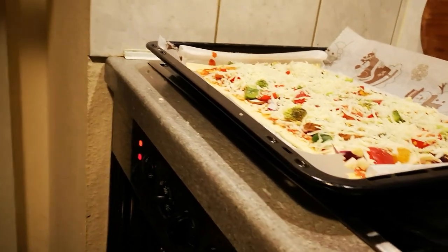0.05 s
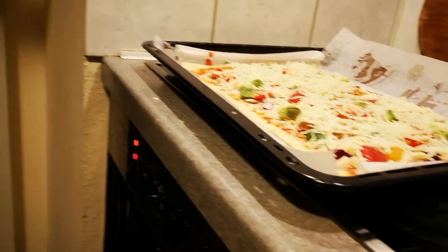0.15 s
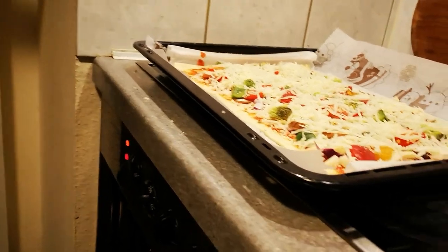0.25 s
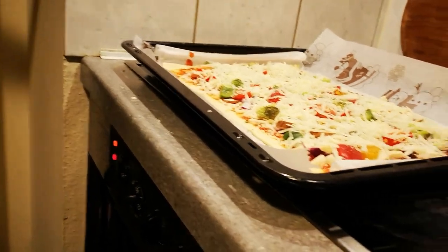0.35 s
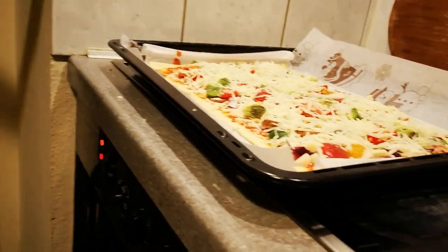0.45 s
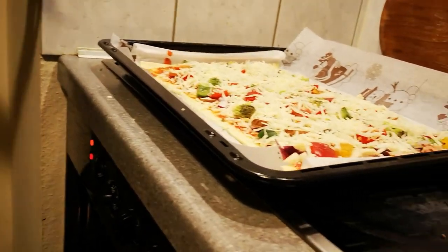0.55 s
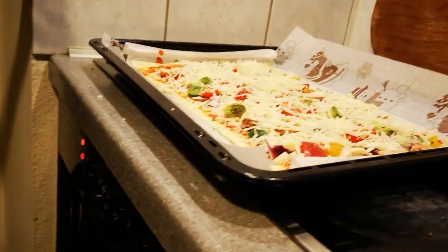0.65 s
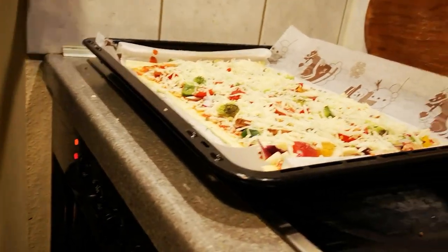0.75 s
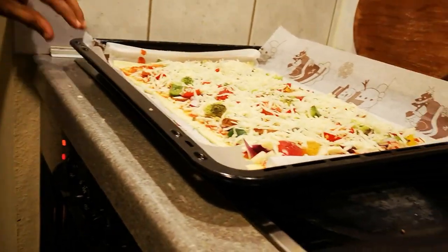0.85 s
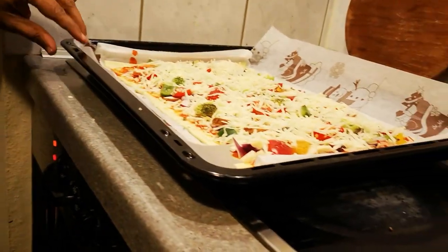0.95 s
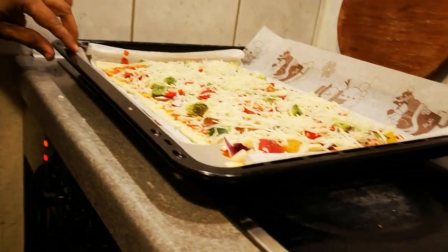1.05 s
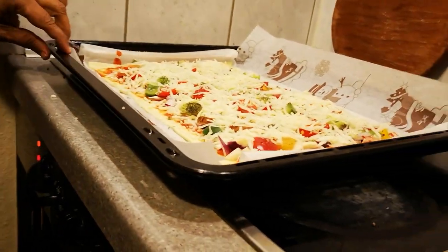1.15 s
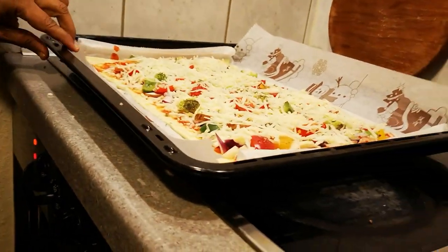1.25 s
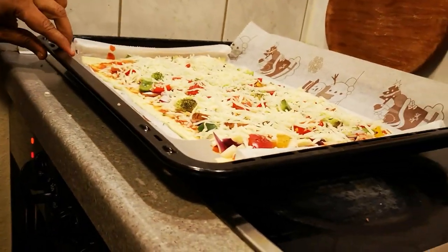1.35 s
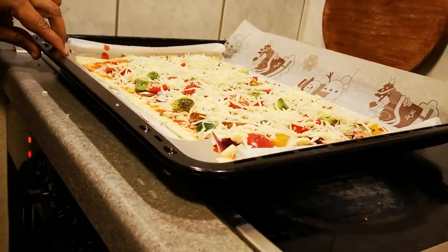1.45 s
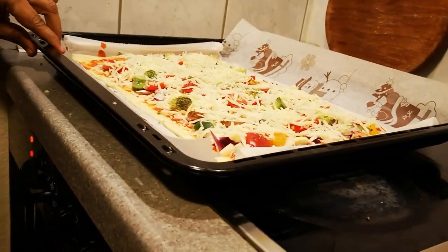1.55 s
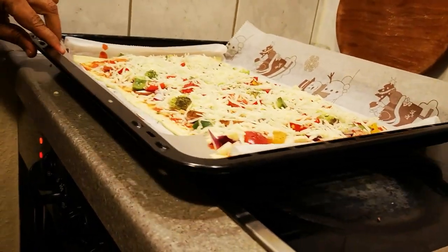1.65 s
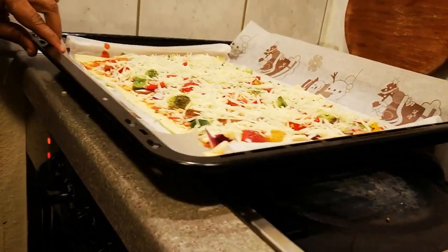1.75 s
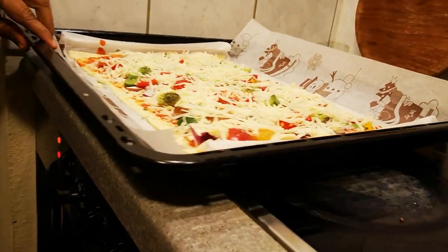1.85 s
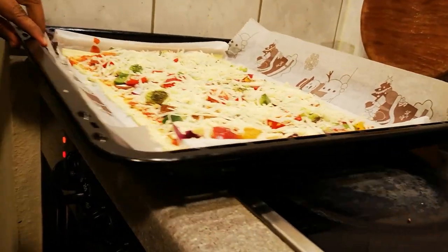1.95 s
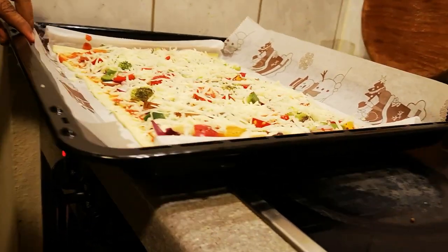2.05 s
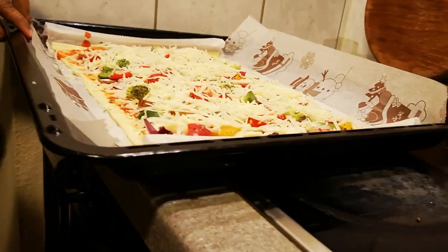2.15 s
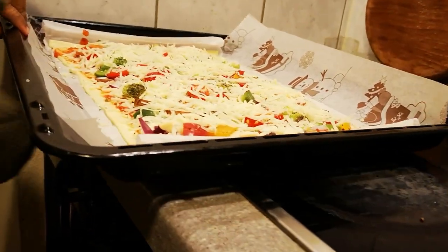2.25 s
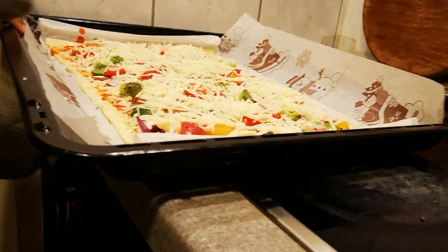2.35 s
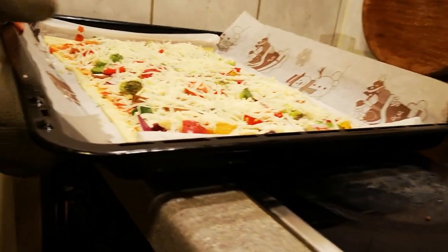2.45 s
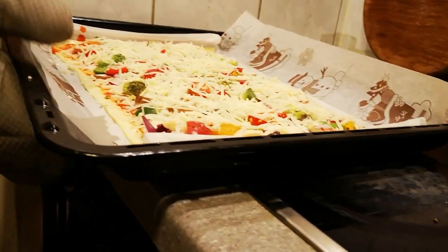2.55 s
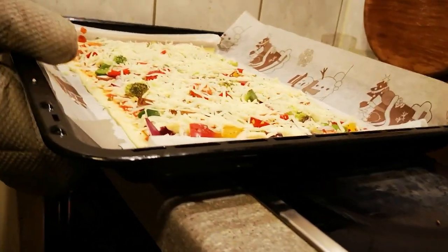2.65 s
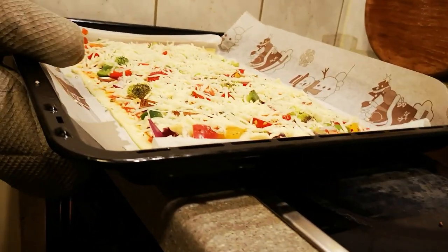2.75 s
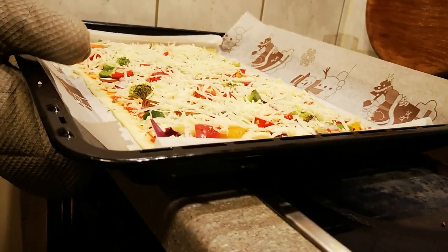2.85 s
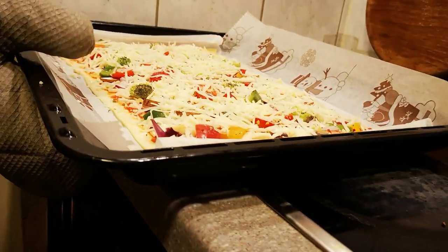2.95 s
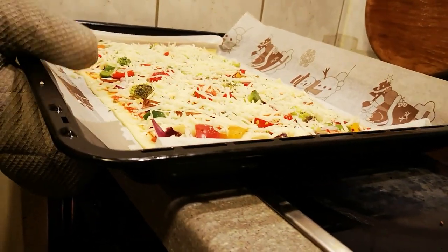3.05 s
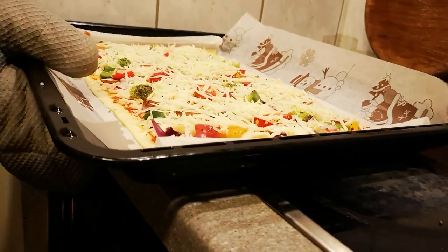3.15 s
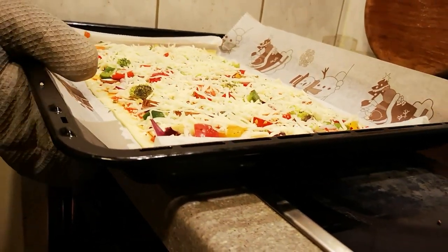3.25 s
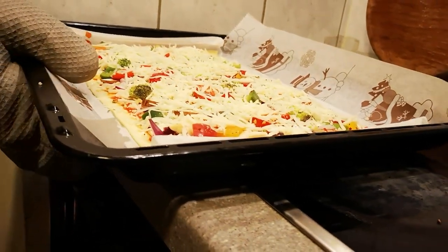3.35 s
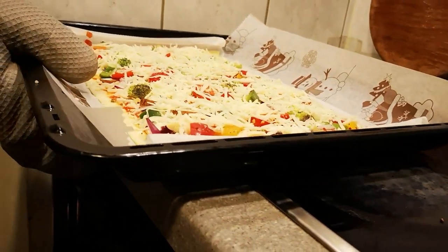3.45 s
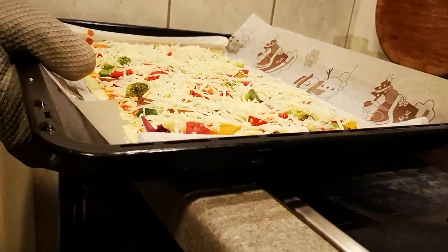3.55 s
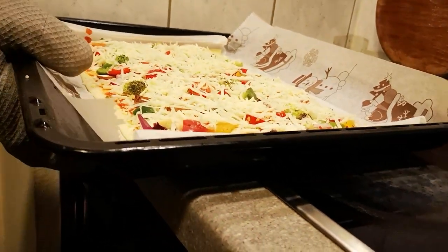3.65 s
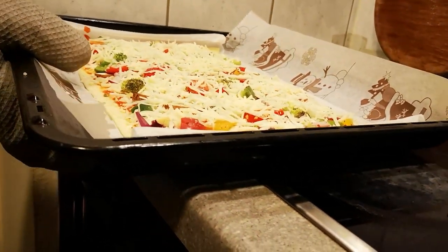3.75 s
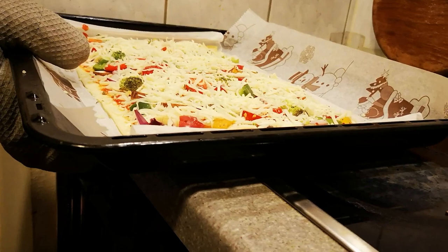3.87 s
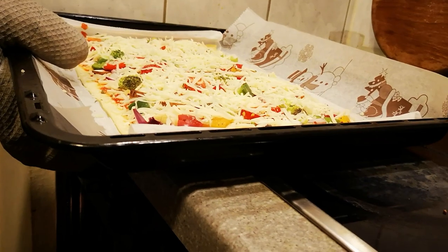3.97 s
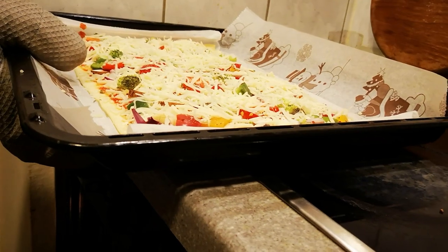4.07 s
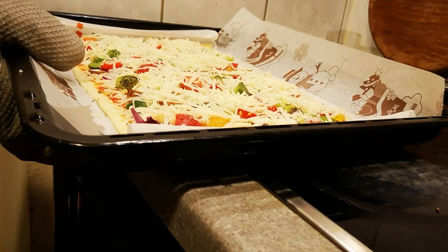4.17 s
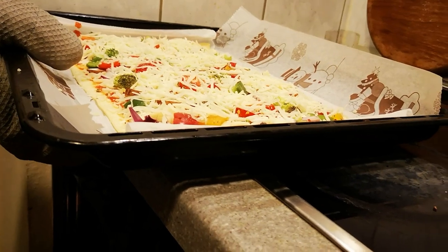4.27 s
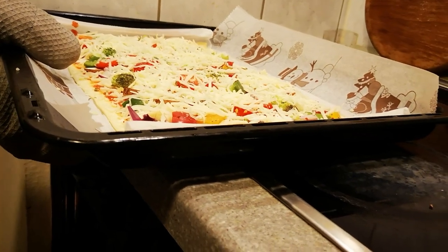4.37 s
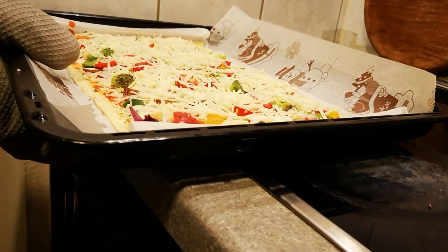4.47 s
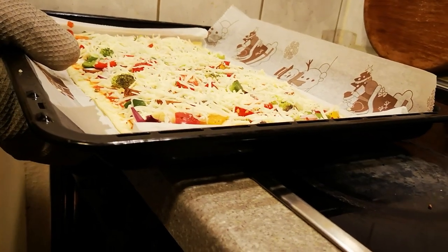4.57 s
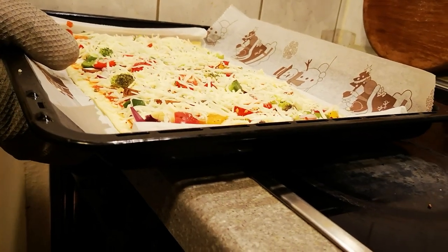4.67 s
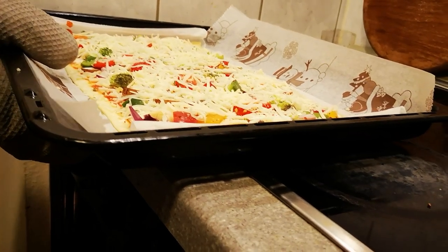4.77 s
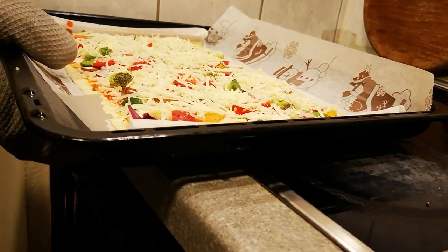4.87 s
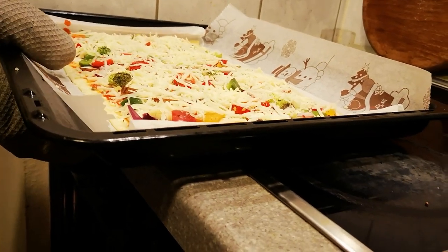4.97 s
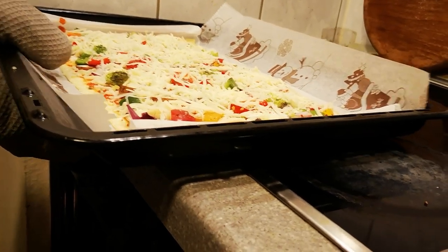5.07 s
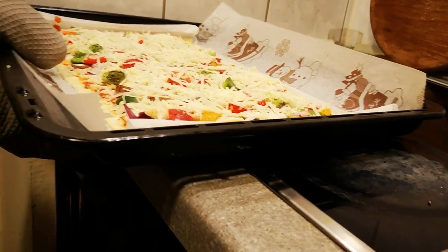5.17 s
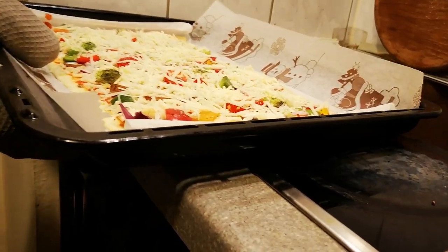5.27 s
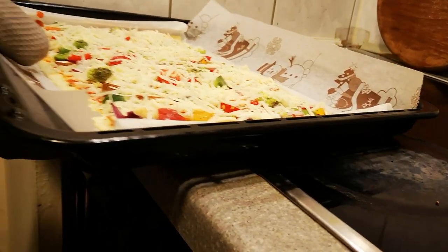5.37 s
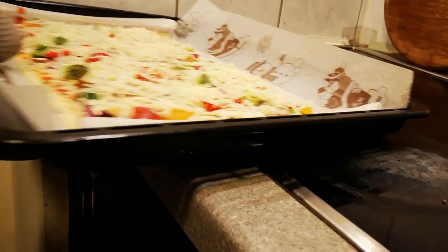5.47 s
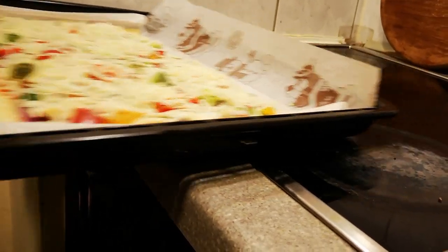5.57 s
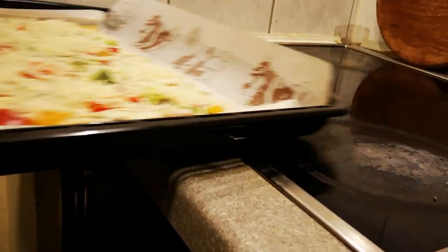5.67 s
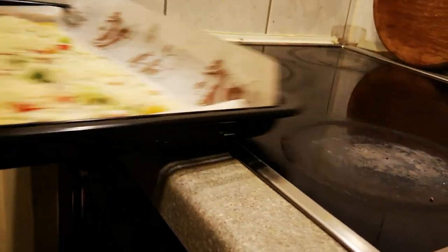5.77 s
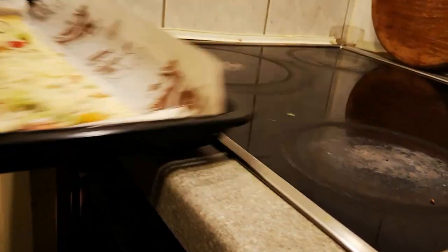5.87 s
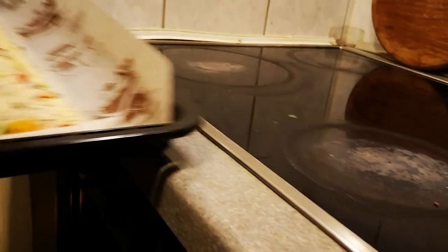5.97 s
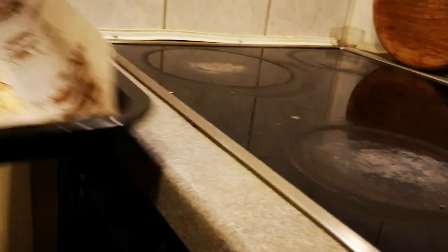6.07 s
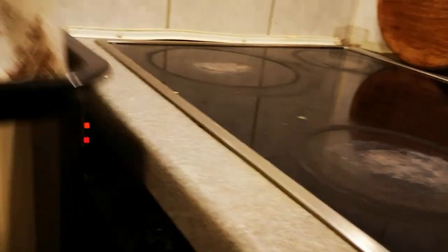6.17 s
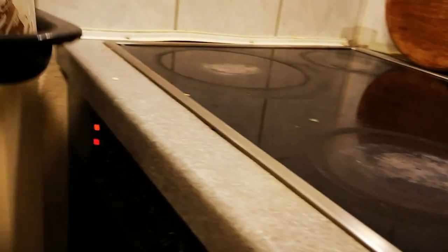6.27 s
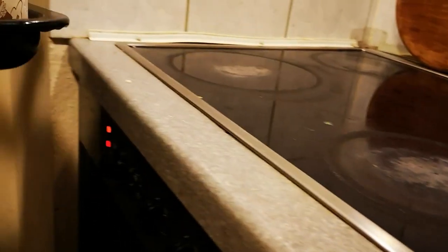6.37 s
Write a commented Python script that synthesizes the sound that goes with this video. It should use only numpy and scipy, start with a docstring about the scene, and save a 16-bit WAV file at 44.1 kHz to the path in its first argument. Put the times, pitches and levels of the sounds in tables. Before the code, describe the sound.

A steel baking tray booms, knocks and scrapes as it is pulled off another tray, ending in a clang, with baking paper rustling.

```python
"""A loaded steel baking tray is worked off a second tray on a kitchen hob and carried away.
Its floor bends with a low boom, its rim knocks and scrapes, and it clangs and clinks as it comes free.
Each knock is a burst of noise plus ringing tones; each scrape is a stream of tiny slips.
Baking paper snaps and rustles, an oven mitt brushes, and a small tiled room echoes over a faint hum."""
import sys
import numpy as np
from scipy import signal
from scipy.fft import rfft, irfft, next_fast_len
from scipy.io import wavfile

SR = 44100
rng = np.random.default_rng(int(sys.argv[2]) if len(sys.argv) > 2 else 0)


def to_wav(s):
    """Save 16-bit WAV."""
    ch = np.atleast_2d(s).T  # columns
    pcm = np.round(np.clip(ch, -1, 1) * 32767)  # PCM
    wavfile.write(sys.argv[1], SR, pcm.astype(np.int16))


N = 283122
T = np.arange(round(.8 * SR)) / SR  # the clock of one short sound, in seconds

# The quiet room's noise. Each row: frequency in Hz, relative strength in dB.
ROOM_COLOUR = [(12, -32), (20, 0.5), (54, -3), (70, -13.5), (103, -7), (171, -23.5), (202, -19.5),
               (362, -29), (393, -26.5), (427, -31.5), (491, -28), (705, -25.5), (788, -32), (1720, -25),
               (15500, -45)]
# The mains hum. Each row: pitch in Hz, level in dB.
HUM_TONES = [(48.4, -69.5), (96.9, -74), (393, -95)]
# How alike the two sides sound. Each row: frequency in Hz, likeness from -1 (opposite) to 1 (same).
LIKENESS = [(120, 0.98), (290, 0.57), (640, -0.37), (3000, -0.062), (7000, 0.32), (15000, 1)]
# The kitchen's echo. Each row: frequency in Hz, seconds to fade by 60 dB.
ECHO_TIMES = [(150, 0.59), (1500, 0.28), (6000, 0.25), (14000, 0.16)]
# Short rubs. Each row: start and length in seconds, first pitch, last pitch and blur in Hz, level in dB.
CHAFE_GLIDES = [(0.046, 0.24, 2770, 2080, 450, -66.5), (0.191, 0.1, 2008, 1260, 390, -61),
                (1.102, 0.03, 3300, 3860, 550, -60.5), (3.272, 0.014, 4590, 5040, 1408, -59),
                (5.285, 0.2, 695, 817, 30, -59)]
# Paper and mitt brushing. Each row: start in seconds, length in seconds, level in dB.
BRUSH_STROKES = [(0.301, .15, -60), (1.365, 0.057, -47), (3.431, .2, -63), (3.557, .085, -55),
                 (3.629, 0.15, -66.5), (4.848, .15, -72.5), (5.623, 0.09, -60), (5.754, .13, -57),
                 (6.048, .11, -53)]
# The paper buckling. Each row: start in seconds, relative level in dB, number of snaps.
SNAP_RUNS = [(1.3721, -36, 4), (2.769, -62, 1), (3.914, -68, 1), (5.088, -66, 1), (5.228, -62.5, 1)]
# Short shoves of the tray. Each row: start, time speeding up and time slowing in seconds, level in dB.
TRAY_SHOVES = [(.01, .17, 0.27, -69.5), (1.24, 0.027, 0.15, -69.5), (1.61, 0.34, .39, -52),
               (1.94, 0.045, .05, -50.5), (3.14, .14, 0.21, -63), (3.4, .26, 0.13, -60),
               (5.88, 0.23, .025, -45.5)]
# The long pull off the lower tray. Each row: time in seconds, relative effort in dB.
LONG_PULL = [(5.15, -81), (5.246, -67.5), (5.334, -68), (5.346, -58), (5.628, -56.5), (5.65, -46.5),
             (5.768, -49), (5.814, -37), (5.885, -49)]
# The tray's floor bending. Each row: start in seconds, level in dB, seconds held, pitch in Hz,
# shudder in dB compared with the boom.
FLOOR_BENDS = [(1.486, -34, 0.049, 69.07, -25), (1.55, -43, 0.22, 70.75, -23),
               (1.755, -32.5, 0.048, 68.1, -10), (1.855, -30.5, 0.067, 69.1, -16),
               (1.93, -27.5, .05, 71.2, -13.5), (2.76, -51, .04, 66.3, -10.5),
               (2.82, -33.5, 0.068, 66, -14), (2.9, -36.5, .05, 62, -19), (3.178, -36, .03, 70.6, -8),
               (3.24, -41, 0.11, 71.1, -9.5), (5.221, -29.5, .045, 75.93, -19),
               (5.81, -27.5, 0.035, 74.07, -8.5), (5.895, -36.5, 0.064, 70.6, -2.5)]
# Blows on the tray. Each row: start in seconds, level in dB, brightness in Hz, flatness from 0 (edge)
# to 1 (whole floor), number of bounces, seconds between them, dB lost per bounce.
TRAY_BLOWS = [(1.258, -67, 2500, 0.93, 0, 0, 0), (1.7523, -26.5, 2720, 0.81, 1, 0.024, 9),
              (2.006, -41.5, 3020, .25, 0, 0, 0), (2.746, -64, 2200, 0.82, 0, 0, 0),
              (2.8197, -47, 2560, .9, 1, .0334, 2), (3.177, -50, 1490, 1, 3, .038, 2.5),
              (5.653, -48.5, 4007, 0.14, 0, 0, 0), (5.809, -35.5, 2500, 0.24, 1, .054, 3.5),
              (5.894, -18, 8400, 0.017, 1, 0.0036, 1.5), (6.022, -40.5, 2400, 0.16, 0, 0.0026, 0)]

# The colours (spectra) of the noises. Each row: frequency in Hz, relative strength in dB.
RUSTLE_COLOUR = [(1500, -20), (4000, -7), (6500, -1.5), (10000, -1.5), (15000, -12)]  # brushed paper
BUCKLE_COLOUR = [(600, -16), (1600, 2), (3200, -17), (4300, -15), (5000, -7), (6000, -14.5), (8200, -12),
                 (9300, -6.5), (10500, -14), (12200, -7), (13200, -15), (15500, -13.5)]  # snapping paper
RASP_COLOUR = [(120, -35), (200, -1.5), (352, -17.5), (399, -17), (607, -16.5), (1130, -1), (1280, -7),
               (1710, -1.5), (2250, -2), (2420, -2.5), (4260, -17), (9310, -21.5), (15500, -39.5)]  # steel sliding on steel
CRACK_COLOUR = [(500, -33.5), (1250, 6.5), (1700, -3), (3500, 1), (5000, -7), (7000, -9.5), (7700, -31),
                (9000, -16.5), (12000, -26), (14000, -22)]  # the struck rim
SHUDDER_COLOUR = [(20, -11), (38, 0), (60, -5), (125, -1), (170, -5), (250, -18.5), (400, -40.5),
                  (800, -69)]  # the bending floor's rough rumble
CLANK_COLOUR = [(60, -11.5), (200, -3), (400, -5), (560, -18), (800, -17.5), (1050, 5.5), (2200, 3.5),
                (3600, -6.5), (7000, -12), (8500, -21), (15000, -19)]  # a crowd of tones that die quickly
CLUNK_COLOUR = [(150, -3.5), (300, -7), (520, -14.5), (700, -1.5), (1050, 1.5), (1350, -15), (1800, -1),
                (2100, -4), (2400, -9), (2800, -9.5), (4000, -30.5), (15000, -57.5)]  # one tray inside the other

# The tones the steel rings with. Each row: pitch in Hz, relative level in dB, seconds to fade by 60 dB.
RIM_TONES = [(1270, -8, .14), (1340, -8, .14), (2032, 3, .19), (2600, -11, .16), (3235, -2, .18),
             (3990, -10, .2), (4235, -11, .22), (4440, -10, .22), (5572, -13, .18), (6520, -14, .2),
             (6799, -10, .19), (7030, -14, .2)]  # the stiff rim
SHEET_TONES = [(1034, -1, .34), (1330, -9, .38), (1384, -13, .4), (1465, 1, .34), (1646, 3, .28),
               (1787, -9, .3), (1938, -11, .38), (1977, -7, .3), (2033, -6, .3), (2234, -9, .3),
               (2283, -3, .28), (2326, -10, .33), (2428, -6, .3), (2702, -13, .33), (2966, -11, .27),
               (3252, -16, .28), (3973, -17, .25), (4269, -16, .25), (4915, -15, .22), (5190, -12, .2),
               (5765, -11, .25), (6255, -12, .23), (6643, -14, .22), (7122, -11, .2)]  # the thin sheet bending
PAN_TONES = [(121, 0, 0.38), (162.4, -3, 0.17), (202.8, 0.5, 0.51), (244.6, -2, 0.4), (311, -6, .3),
             (337, -8, 0.52), (373, -6.5, 0.35)]  # the whole pan swaying


def amp(db):
    """Turn decibels into a gain."""
    return 10 ** (np.asarray(db) / 20)


def unit(x):
    """Scale a sound to an average (rms) size of 1."""
    return x / np.sqrt(np.mean(x ** 2) + 1e-20)


def along(points, hz):
    """Read between a table's rows on a logarithmic frequency scale."""
    freqs, values = np.transpose(points)
    return np.interp(np.log(hz + 1), np.log(freqs + 1), values)


def fade(t60, t=T):
    """A fall of 60 dB every t60 seconds."""
    return np.exp(-np.log(1000) * t / t60)


def filtered(x, response):
    """Multiply each frequency in a sound by response(hz)."""
    size = next_fast_len(x.shape[-1] + 8192)
    hz = np.fft.rfftfreq(size, 1 / SR)
    return irfft(rfft(x, size) * response(hz), size)[..., :x.shape[-1]]


def coloured(x, colour):
    """Give a sound a colour and an average size of 1."""
    return unit(filtered(x, lambda hz: amp(along(colour, hz))))


def butter(x, hz, kind, order=2):
    """Keep the 'low' or the 'high' side of a frequency."""
    return signal.sosfilt(signal.butter(order, min(hz, .45 * SR), kind, fs=SR, output='sos'), x)


def add(track, start, x):
    """Mix a sound into the track from start seconds on."""
    part = track[..., round(start * SR):][..., :x.shape[-1]]
    part += x[..., :part.shape[-1]]


def waver(hz):
    """A random curve that wanders at rates up to about hz."""
    return unit(butter(rng.standard_normal(N), hz, 'low'))


def burst(colour, t60):
    """Dying noise whose first 5 milliseconds have an average size of 1."""
    noise = coloured(rng.standard_normal(len(T)), colour) * fade(t60)
    return noise / np.std(noise[T < .005])


def diffuse(pair):
    """Blend two unrelated sounds into left and right, alike in the bass."""
    turn = lambda hz: np.arccos(np.clip(along(LIKENESS, hz), -1, 1)) / 2
    mid, side = filtered(pair, lambda hz: np.array([np.cos(turn(hz)), np.sin(turn(hz))]))
    return np.array([mid + side, mid - side])


def ring(tones, scatter_db=2):
    """Fading tones; each blow lands somewhere new and shares its force among them differently."""
    out = np.zeros(len(T))
    for hz, db, t60 in tones:
        gain = amp(db + scatter_db * rng.standard_normal())
        out += gain * fade(t60) * np.sin(2 * np.pi * (hz * T + rng.random()))
    return out


def radiated(tones):
    """A wide sheet sends each tone differently to the two sides."""
    return diffuse(np.array([ring(tones), ring(tones)])) * (1 - fade(.004))


def friction(slips_per_s, spread_db, hiss):
    """Tiny slips of uneven size over a smooth hiss, while the hand's pressure wavers."""
    slips = (rng.random(N) < slips_per_s / SR) * rng.choice([-1, 1], N)
    sizes = amp(spread_db * rng.standard_normal(N))
    pressure = amp(1.8 * waver(hz=25))
    return unit(pressure * (unit(slips * sizes) + hiss * rng.standard_normal(N)))


def stroke(start, rise, fall, db):
    """The gain of one rub: it grows as the hand speeds up and shrinks as it stops."""
    speed = np.interp(np.arange(N) / SR, [start, start + rise, start + rise + fall], [0, 1, 0])
    return amp(db) * speed ** 1.1


def in_kitchen(x, tail_db, early_db=-1):
    """The direct sound, quick echoes off worktop and tiles, then the room's fading tail."""
    hz, t, bands = signal.stft(rng.standard_normal((2, len(T))), SR, nperseg=256)
    bands = bands * fade(along(ECHO_TIMES, hz)[:, None], t)
    tail = signal.istft(bands, SR, nperseg=256)[1][:, :len(T)]
    tail *= 1 - np.exp(-T / .014)  # the tail takes a moment to build
    early = rng.standard_normal((2, len(T))) ** 3 * fade(.024) * (T > .001)
    room = diffuse(amp(tail_db) * unit(tail) + amp(early_db) * unit(early)) / np.sqrt(len(T))
    room[:, 0] += 1  # the direct sound
    return signal.fftconvolve(x[None], room / np.linalg.norm(room[0]), axes=1)[:, :len(x)]


def background(noise_db=-64.5):
    """Low room rumble, hiss and an appliance's hum."""
    t = np.arange(N) / SR
    hum = sum(amp(db) * np.sqrt(2) * np.sin(2 * np.pi * (hz * t + rng.random())) for hz, db in HUM_TONES)
    noise = coloured(diffuse(rng.standard_normal((2, N))), ROOM_COLOUR)
    return amp(noise_db) * noise + hum


def chafes():
    """Sticking and slipping glides with the hand's speed: a swish if ragged, a squeak if regular."""
    out = np.zeros(N)
    for start, length, first_hz, last_hz, blur_hz, db in CHAFE_GLIDES:
        progress = np.minimum(T / length, 1)
        phase = 2 * np.pi * np.cumsum(first_hz + (last_hz - first_hz) * progress) / SR
        jitter = butter(rng.standard_normal((2, len(T))), blur_hz, 'low')
        swish = unit(jitter[0] * np.cos(phase) + jitter[1] * np.sin(phase))
        add(out, start, amp(db) * np.sin(np.pi * progress) ** 2 * swish)
    return in_kitchen(out, tail_db=-1)


def rustle(rise=.3):
    """Paper and mitt brush along the tray; rise is the share of each stroke spent speeding up."""
    effort = sum(stroke(start, rise * length, (1 - rise) * length, db)
                 for start, length, db in BRUSH_STROKES)
    slips = friction(slips_per_s=1000, spread_db=3.5, hiss=.82)
    return in_kitchen(effort * coloured(slips, RUSTLE_COLOUR), tail_db=-10.5)


def paper_snaps(bright_hz=8670, first_gap_s=.0045, slowing=2.3, boost_db=9.5, loss_db=4):
    """Stiff paper buckles in bright snaps, singly or in a run that slows and weakens."""
    out = np.zeros((2, N))
    for start, db, count in SNAP_RUNS:
        for k in range(round(count)):
            snap = butter(burst(BUCKLE_COLOUR, t60=.042), bright_hz, 'low')
            snap = butter(snap, bright_hz * .52, 'high')
            gain = amp(db + boost_db - k * loss_db)
            add(out, start + first_gap_s * k ** slowing, gain * in_kitchen(snap, tail_db=0))
    return out


def scrape(pull_boost_db=2):
    """Tiny slips under the sliding tray rasp and keep its steel sheet singing."""
    pull_db = np.interp(np.arange(N) / SR, *np.transpose(LONG_PULL), left=-np.inf, right=-np.inf)
    effort = amp(pull_db + pull_boost_db) + sum(stroke(*shove) for shove in TRAY_SHOVES)
    slips = friction(slips_per_s=800, spread_db=4.2, hiss=.5)
    sheet = butter(ring(SHEET_TONES), 3500, 'low')
    singing = unit(signal.fftconvolve(slips, sheet)[:N])
    rasp = butter(coloured(slips, RASP_COLOUR), 240, 'high', order=1)
    return in_kitchen(effort * (rasp + amp(-13) * singing), tail_db=-1.5, early_db=-.5)


def rim_clink(start=6.0695):
    """The stiff rim is clipped as the tray swings clear: a crack and a short ring."""
    out = np.zeros((2, N))
    crack = in_kitchen(burst(CRACK_COLOUR, t60=.054), tail_db=-6.5)
    add(out, start, amp(-28.5) * crack + amp(-34) * radiated(RIM_TONES))
    return out


def floor_boom(swell_s=.026, damped_t60=.12, free_t60=.9, free_db=-19, grip_hz=15):
    """Bent by hand or by a blow, the loaded floor booms and shudders, is damped, then rings faintly."""
    power = np.zeros((2, N))
    for start, db, hold, _, shudder_db in FLOOR_BENDS:
        swell = np.sin(np.pi / 2 * np.minimum(T / swell_s, 1))
        after = np.maximum(T - hold, 0)
        release = np.maximum(fade(damped_t60, after), amp(free_db) * fade(free_t60, after))
        add(power, start, (amp([[db], [db + shudder_db]]) * swell * release) ** 2)
    boom_gain, shudder_gain = np.sqrt(power)
    pitch_points = [(start + hold / 2, hz) for start, _, hold, hz, _ in FLOOR_BENDS]
    pitch = np.interp(np.arange(N) / SR, *np.transpose(pitch_points))
    pitch *= 1 + .035 * waver(grip_hz)  # the unsteady grip shakes the pitch
    phase = 2 * np.pi * np.cumsum(pitch) / SR
    boom = np.sin(phase) + amp(-24.5) * np.sin(2 * phase)  # buckling adds a faint octave
    boom *= amp(1.4 * waver(grip_hz))  # the grip shakes the level too
    shudder = coloured(rng.standard_normal(N), SHUDDER_COLOUR)
    return boom_gain * boom + shudder_gain * shudder


def blow(bright_hz, flatness):
    """One clank, dulled by a soft contact. Edge blows favour the sheet, flat ones the clunk and pan."""
    gain = lambda edge_db, flat_db: amp(np.interp(flatness, [0, 1], [edge_db, flat_db]))
    clank = amp(2.5) * butter(burst(CLANK_COLOUR, t60=.041), bright_hz, 'low')
    clunk = gain(-22, 2) * burst(CLUNK_COLOUR, t60=.12)
    sheet = gain(-12.5, -20) * butter(radiated(SHEET_TONES), bright_hz, 'low')
    pan = gain(-19, -8.5) * radiated(PAN_TONES)
    return in_kitchen(clank + clunk, tail_db=-3) + sheet + pan


def knocks():
    """The tray is knocked and may rock and land again in evenly spaced, ever weaker bounces."""
    out = np.zeros((2, N))
    for start, db, bright_hz, flatness, bounces, gap, loss_db in TRAY_BLOWS:
        for k in range(1 + round(bounces)):
            add(out, start + k * gap, amp(db - k * loss_db) * blow(bright_hz, flatness))
    return out


def scene(paper_lag_s=.000012):
    """The tray sits near the middle; the paper is to the right, so it is louder and earlier there."""
    sides = np.array([[-1], [1]])
    to_right = lambda hz: amp(1.2 * sides) * np.exp(1j * sides * np.pi * hz * paper_lag_s)
    paper = filtered(paper_snaps() + rustle(), to_right)
    return knocks() + floor_boom() + rim_clink() + scrape() + chafes() + paper + background()


def record(dry, widen=.38, delay_s=26 / SR, top_hz=15300):
    """Widen the midrange with a delayed copy of the middle, and cut the highest treble."""
    band = lambda hz: along([(60, .05), (250, .38), (550, .67), (3000, .76), (8000, .35)], hz)
    side = filtered(dry.mean(axis=0), lambda hz: widen * band(hz) * np.exp(-2j * np.pi * hz * delay_s))
    return filtered(dry + np.array([-side, side]), lambda hz: hz < top_hz)


dry = scene()
out = record(dry)
to_wav(out)
```